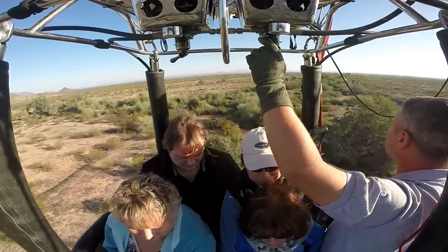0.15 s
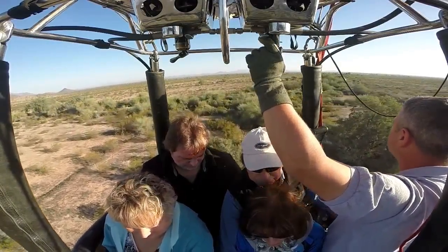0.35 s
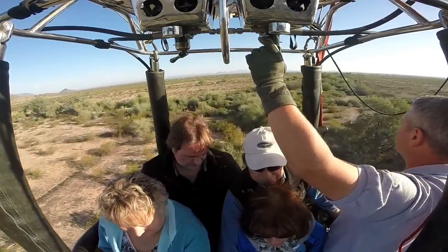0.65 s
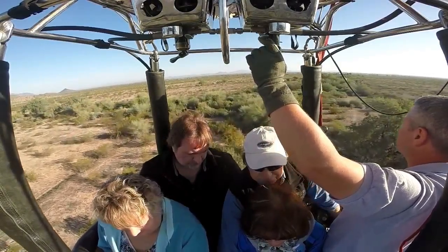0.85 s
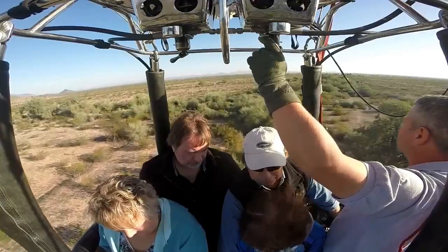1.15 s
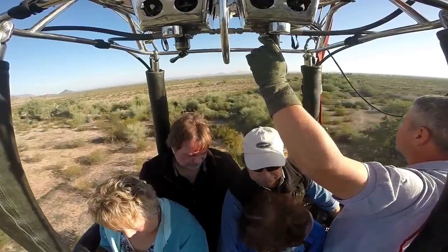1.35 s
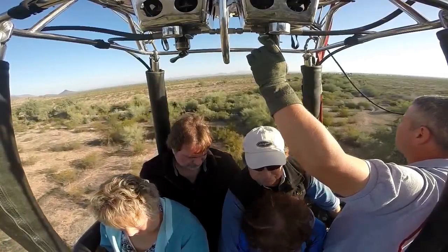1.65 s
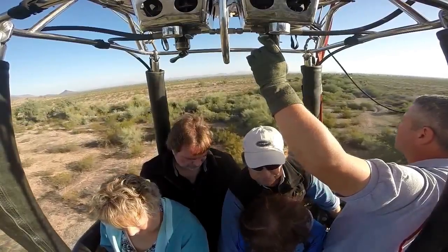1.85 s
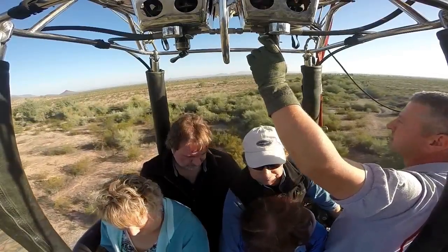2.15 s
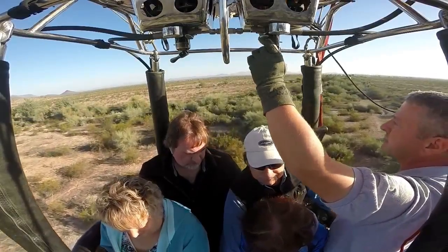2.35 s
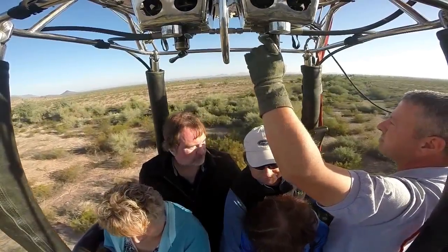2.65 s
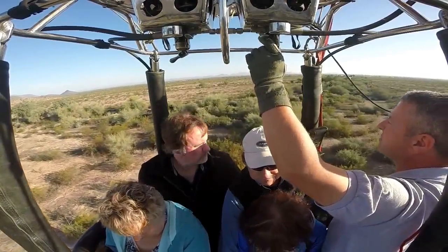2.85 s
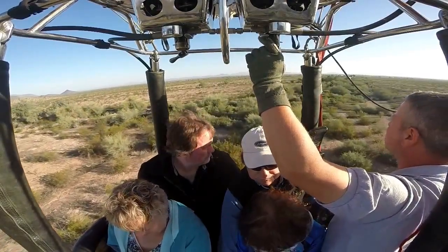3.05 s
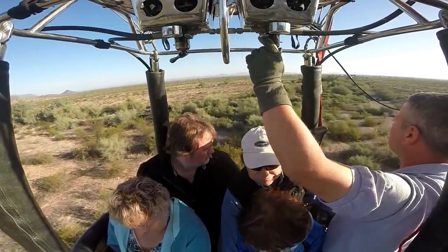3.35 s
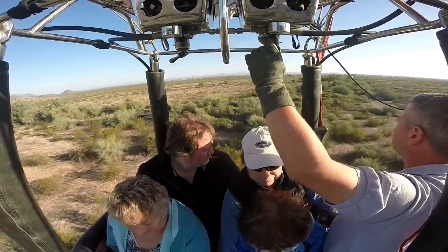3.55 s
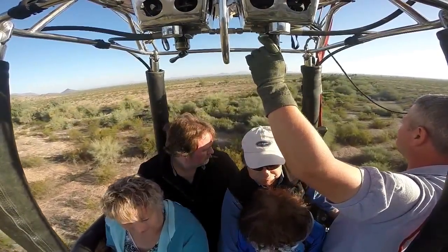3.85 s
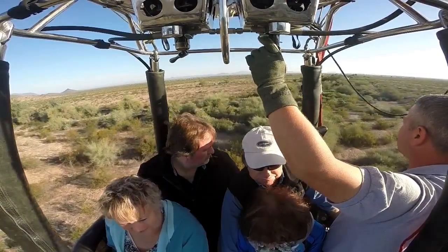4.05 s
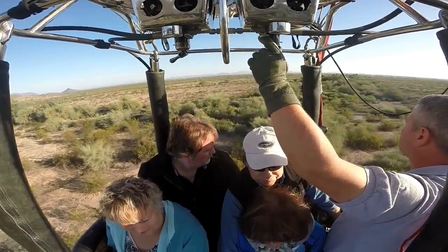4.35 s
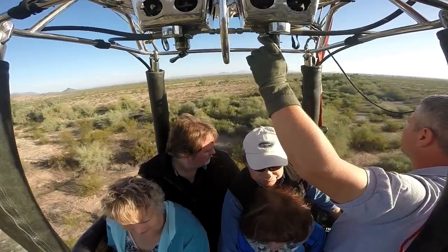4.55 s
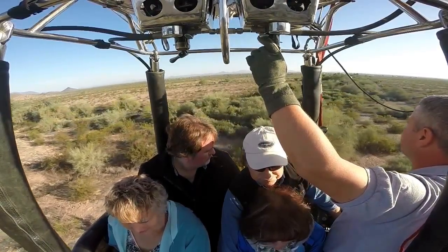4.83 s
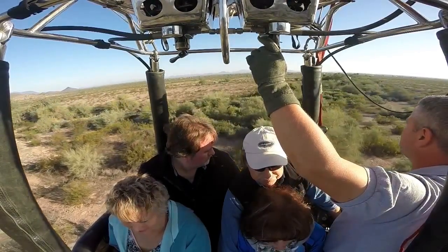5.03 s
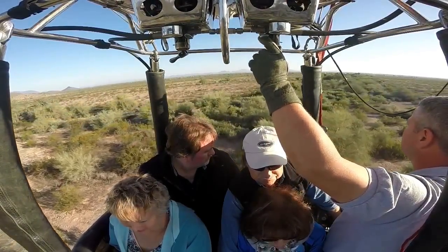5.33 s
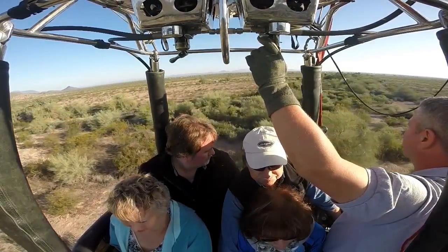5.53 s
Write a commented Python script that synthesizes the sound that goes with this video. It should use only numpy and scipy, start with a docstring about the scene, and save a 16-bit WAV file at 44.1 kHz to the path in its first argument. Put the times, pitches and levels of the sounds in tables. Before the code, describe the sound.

A hot-air balloon's propane burner fires six short roaring blasts close overhead, each catching with a low thump, over a soft rustling pilot flame.

```python
"""A small pilot flame rustles and whistles softly, then a propane burner above a balloon basket fires six blasts.
Each opening of the valve spits unlit gas and lights with a low thump, made from one or two pressure pulses.
The flame's roar is shaped noise, whose hiss dulls as the pressure in the coil sags; slower noise rumbles below.
The fabric overhead adds a faint wash to the flame. A small camera in a closed case hears it all."""
import sys
import numpy as np
from scipy import signal
from scipy.fft import rfft, irfft, next_fast_len
from scipy.io import wavfile
from scipy.ndimage import uniform_filter1d, map_coordinates

SR = 44100
rng = np.random.default_rng(int(sys.argv[2]) if len(sys.argv) > 2 else 0)


def int16_out(signal):
    """Quantize to a 16-bit WAV file."""
    q = np.round(np.clip(np.atleast_2d(signal).T, -1, 1) * 32767)
    wavfile.write(sys.argv[1], SR, q.astype(np.int16))


N = 250929

# The six openings of the valve. Each row: opens in seconds, flame starts to die in seconds, time scale of dying
# in seconds, goes out in seconds, roar in dB, hiss over its usual level in dB, time to full flame in seconds,
# how far short of full it starts in dB, surge at full flame in dB, spit of unlit gas in dB, eddies in dB.
BLASTS = [(0.352, 0.901, .21, 1.08, -14.5, 1, .17, 13, 1.5, -29, -26.5),
          (1.188, 1.919, 0.21, 2.064, -15, -0.1, 0.067, 2, 2, -48, -32),
          (2.448, 3.139, 0.22, 3.34, -14.5, 0.04, 0.13, 3, 1, -50, -36),
          (3.434, 4.094, 0.24, 4.305, -15, 0, 0.081, 4, 2, -45, -31),
          (4.321, 4.982, 0.24, 5.16, -15, -0.65, 0.093, 1, 2.5, -48, -30),
          (5.343, 5.94, .2, 6.1, -14.5, 0.8, 0.04, 5, 4, -40, -35)]

CATCH_S, CATCH_DB, CATCH_BEND = 0.045, 48, 3.1  # the flame climbs this far in this time, fast at first
DIE_DB, DIE_BEND = 31, 2.05  # it falls this far in the time scale of dying, slowly at first
HISS_LAG_S, HISS_LAG_DB = 0.021, 13  # the hiss arrives after the roar; dB before the dulling shares
SAG_LEAD_S, SAG_DB_PER_S, SAG_KNEE_S = 0.25, 37, 0.13  # the hiss sags from about this long before the flame dies
SETTLE_S, SHORT_DULLS = 0.063, 0.35  # time scale of the surge; hiss lost per dB that the flame is short
OUT_DB_PER_S = 600  # extra fall of the roar once the flame goes out
EDDY_BUILD_S, EDDY_CALM_DB, EDDY_DRIFT_DB = 0.21, -44, 3.5  # eddies lag the flame, never quite rest, and drift
EDDY_LINGER_S = 0.047  # the eddies start to die this long after the flame does
SPIT_AFTER_S, SPIT_T60_S = 0.011, 0.014  # delay of the main puff, and its time to fall by 60 dB
SEAT_LEAD_S, SEAT_DB = 0.005, -10  # a weaker puff leads as the seat lifts
TOP_HZ = 15290  # nothing is heard above this


def amp(db):
    """Decibels to gain."""
    return 10 ** (np.asarray(db) / 20)


def unit(x):
    """Scaled to an average (rms) strength of 1."""
    return x / np.sqrt(np.mean(x ** 2) + 1e-20)


def along(points, hz):
    """Reads a curve of (Hz, value) points, joined by lines on a log frequency axis."""
    f, v = np.transpose(points)
    return np.interp(np.log(hz + 1), np.log(f + 1), v)


def curves(rows):
    """One value per sample for each column after the time."""
    s, *cols = np.transpose(rows)
    return [np.interp(np.arange(N) / SR, s, c) for c in cols]


def wobble(rate):
    """A smooth random curve, with rate random points a second."""
    knots = rng.standard_normal(int(N * rate / SR) + 4)
    return map_coordinates(knots, [np.arange(N) * rate / SR])


def filtered(x, response):
    """Changes the strength of each frequency in x by a response."""
    m = next_fast_len(N + SR // 2)  # spare room keeps the end from wrapping onto the start
    return irfft(rfft(x, m) * response(np.fft.rfftfreq(m, 1 / SR)), m)[..., :N]


def turbulence(spectrum, patchy_db, loss_db=np.zeros(N)):
    """Churning gas: noise of rms 1 with patches of random gain; a negative loss_db darkens its treble."""
    # How strongly loss_db acts. Each row: frequency in Hz, share of the hiss loss.
    dulling = [(300, 0.025), (1200, 0.25), (2500, 0.58), (5000, 0.8), (8000, 1.49), (14000, 1.27)]
    hz, t, z = signal.stft(rng.standard_normal(N), SR, nperseg=256)
    field = uniform_filter1d(rng.standard_normal(z.shape), size=4, axis=0)
    field = uniform_filter1d(field, size=9, axis=1)
    loss = along(dulling, hz)[:, None] * np.interp(t, np.arange(N) / SR, loss_db)
    gain = amp(patchy_db * unit(field) + loss)
    noise = signal.istft(z * gain, SR, nperseg=256)[1][:N]
    return unit(filtered(noise, lambda f: amp(along(spectrum, f))))


def flame_shape(opens, dies, fall_s):
    """One blast in dB under full flame: a quick catch, a hold, an ever faster fall."""
    t = np.arange(N) / SR
    short = np.clip(1 - (t - opens) / CATCH_S, 0, 1) ** CATCH_BEND
    catch = np.where(t > opens, CATCH_DB * short, np.inf)  # silent before the valve opens
    return -catch - DIE_DB * (np.clip(t - dies, 0, None) / fall_s) ** DIE_BEND


def pilot():
    """The small flame rustles as noise; its nozzle whistles because narrow bands of noise resonate."""
    # Loudness over time. Each row: time in seconds, rustle in dB, whistle in dB.
    levels = [(0, -37, -57), (.35, -39.5, -58.5), (1.1, -44, -65), (2.1, -42.5, -68), (2.45, -38.5, -69),
              (3.4, -42, -67), (5.2, -40.5, -66)]
    # Colour of the rustle. Each row: frequency in Hz, level in dB per Hz.
    rustle_colour = [(35, -13), (60, -4), (102, 0), (178, -13.5), (323, -4.5), (361, -6.5), (877, -13),
                     (1310, -17.5), (1560, -31), (5520, -48), (12000, -74), (15600, -96), (22000, -120)]
    # Bands of the nozzle. Each row: centre in Hz, width in Hz, level in dB.
    bands = [(1800, 550, -32), (2050, 40, 12), (2930, 320, 12), (4250, 150, -12), (5330, 290, -6),
             (7000, 2500, -30)]

    def nozzle(f):
        ringing = sum(amp(db) * 1j * f * w / (c * c - f * f + 1j * f * w) for c, w, db in bands)
        return ringing / (1 + (f / 12300) ** 14)  # almost nothing is left at the very top

    rustle_db, whistle_db = curves(levels)
    whistle = unit(filtered(rng.standard_normal(N), nozzle))
    rustle = amp(rustle_db + 0.83 * wobble(33)) * turbulence(rustle_colour, patchy_db=1.5)
    return rustle + amp(whistle_db + 0.8 * wobble(5.2)) * whistle


def envelope(x):
    """The huge fabric bell above answers faintly: a fading noise tail smears the sound into a soft wash."""
    # Colour of the answer. Each row: frequency in Hz, level in dB.
    answer_colour = [(150, -39), (800, 10), (2000, 5), (3500, 3), (6000, -12), (12000, -30)]
    t = np.arange(SR // 2) / SR
    fade = amp(-60 * t / 0.42) * (1 - np.exp(-t / 0.013))  # soft start, then 60 dB down per 0.42 s
    tail = rng.standard_normal(len(t)) * fade
    wash = signal.fftconvolve(x, tail / np.linalg.norm(tail))[:N]
    return filtered(wash, lambda f: amp(along(answer_colour, f)))


def valve():
    """A few milliseconds of unlit gas as the valve cracks open: noise puffs that start at once and fade."""
    # Colour of the spit. Each row: frequency in Hz, level in dB per Hz.
    spit_colour = [(300, 2), (900, 0), (2000, -2), (4000, -12), (8000, -23), (14000, -40)]
    t = np.arange(N) / SR - SPIT_AFTER_S

    def puff(s, db):
        return amp(db - 60 * np.abs(t - s) / SPIT_T60_S) * (t > s)

    puffs = np.zeros(N)
    for opens, *_, spit_db, _ in BLASTS:
        puffs += puff(opens, spit_db) + puff(opens - SEAT_LEAD_S, spit_db + SEAT_DB)
    return puffs * turbulence(spit_colour, patchy_db=-1.0)


def ignition():
    """The gas cloud lights with one push of pressure, or two in quick succession, each between sucks."""
    # Each row is one push: time in seconds, strength before the suck is taken off in dB, length scale in seconds.
    pushes = [(0.379, -5, 0.002), (0.3864, 6, 0.0032), (1.22, -6, 0.0025), (1.227, -1.5, 0.0051),
              (2.494, 0.5, 0.0054), (2.502, -2.5, 0.0044), (3.473, 0, 0.0031), (4.374, -15, 0.0061),
              (5.386, -7.5, 0.012)]
    out, t = np.zeros(N), np.arange(N) / SR
    for s, push_db, length in pushes:
        push = np.exp(-((t - s) / (0.47 * length)) ** 2)
        # wider and slightly later, so it shows before and after the push
        suck = 0.18 * np.exp(-((t - s - 0.28 * length) / (2.9 * length)) ** 2)
        out += amp(push_db) * (push - suck)
    return out


def rumble():
    """Eddies: lumpy low pressure swings that build up while the flame is on."""
    # Colour of the eddies. Each row: frequency in Hz, level in dB per Hz.
    eddy_colour = [(12, -46), (20, 1.5), (59, 0), (162, -5), (200, 3), (260, -10), (440, -120)]
    t, stirred = np.arange(N) / SR, np.zeros(N)
    for opens, dies, fall_s, *_, eddy_db in BLASTS:
        build = 1 - np.exp(-np.clip(t - opens, 0, None) / EDDY_BUILD_S)
        stirred += amp(eddy_db + flame_shape(opens, dies + EDDY_LINGER_S, fall_s)) * build
    drift_db = EDDY_DRIFT_DB * wobble(3.73) + 3.1 * wobble(10)
    lumps = unit(amp(drift_db) * turbulence(eddy_colour, patchy_db=2.0))
    return (stirred + amp(EDDY_CALM_DB)) * lumps


def burner():
    """The flame roars and flutters; less pressure at the jets takes the hiss first."""
    # Colour at full pressure. Each row: frequency in Hz, level in dB per Hz.
    roar_colour = [(35, -29), (60, -5.5), (191, -2.5), (236, -3.5), (271, -0.5), (384, -5), (495, -3),
                   (702, -9), (1070, -8.5), (1510, -19.5), (3560, -21.5), (4700, -34.5), (6980, -30.5),
                   (13000, -41), (15400, -50)]
    t, roar, loss_db = np.arange(N) / SR, np.zeros(N), np.zeros(N)
    for opens, dies, fall_s, out, roar_db, hiss_db, full_s, short_db, surge_db, _, _ in BLASTS:
        since = np.clip(t - opens, 0, None)
        lacking_db = short_db * np.clip(1 - since / full_s, 0, 1)
        swell_db = surge_db * np.exp(-((since - full_s) / SETTLE_S) ** 2) - lacking_db
        out_db = -OUT_DB_PER_S * np.clip(t - out, 0, None)
        roar += amp(roar_db + swell_db + out_db + flame_shape(opens, dies, fall_s))
        # the sag bends in smoothly, then grows steadily
        sag = SAG_KNEE_S * np.logaddexp(0, (t - dies + SAG_LEAD_S) / SAG_KNEE_S)
        late_db = HISS_LAG_DB * np.exp(-since / HISS_LAG_S)
        blast_hiss_db = hiss_db - SHORT_DULLS * lacking_db - late_db - SAG_DB_PER_S * sag
        loss_db = np.where(t > opens, blast_hiss_db, loss_db)
    flutter_db = 0.47 * wobble(14) + 0.36 * wobble(55)
    hissing = turbulence(roar_colour, patchy_db=0.7, loss_db=np.maximum(loss_db, -19))
    return roar * amp(flutter_db) * hissing


def scene():
    """Open air around the basket, the balloon overhead."""
    flame = burner()
    answer = amp(-22) * envelope(flame)
    return (valve() + flame + answer + rumble() + ignition() + pilot())[None]


def record(dry):
    """The camera case colours the sound, the strongest pressure swings clip, and the top is cut off."""
    # Case resonances and notches. Each row: centre in Hz, width in Hz, lift in dB.
    resonances = [(272, 76, -1), (575, 130, 0), (794, 69, 4), (1676, 33, 3.5), (2153, 70, 3.5),
                  (2830, 780, -4.5), (3170, 175, 4), (4150, 520, 3), (4340, 280, -3), (5560, 230, 3.5),
                  (6120, 260, -3), (6800, 730, 3.5), (8540, 350, 1.5), (9800, 270, -3), (11700, 700, -3.5),
                  (14700, 500, -4)]

    def case(f):
        return amp(sum(db / (1 + (2 * (f - c) / w) ** 2) for c, w, db in resonances))

    heard = filtered(dry, case)
    clipped = heard / (1 + np.abs(heard) ** 30) ** (1 / 30)  # a tight bend just below full scale
    return filtered(clipped, lambda hz: np.clip((TOP_HZ - hz) / 60, 0, 1))


dry = scene()
out = record(dry)
int16_out(out)
```